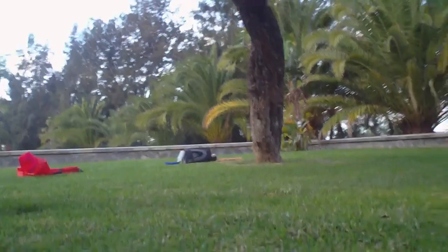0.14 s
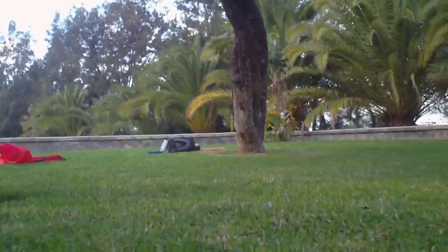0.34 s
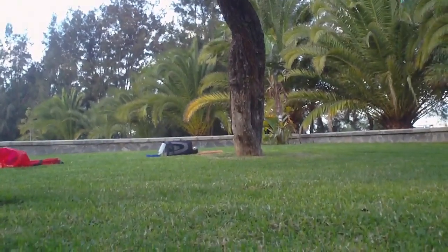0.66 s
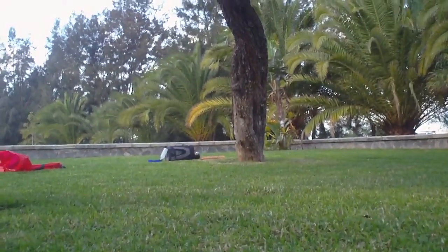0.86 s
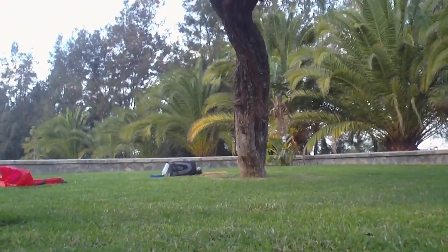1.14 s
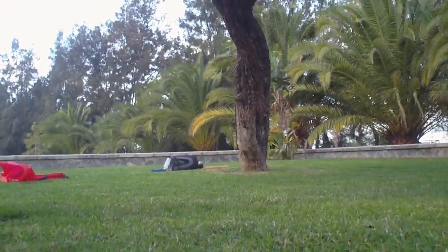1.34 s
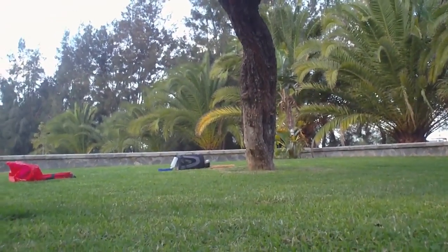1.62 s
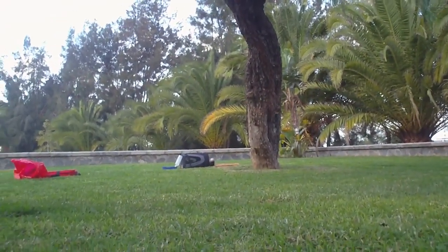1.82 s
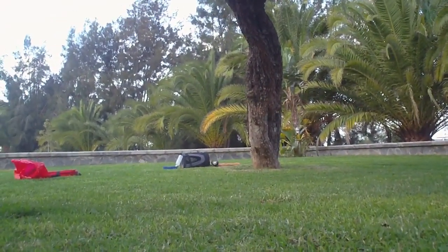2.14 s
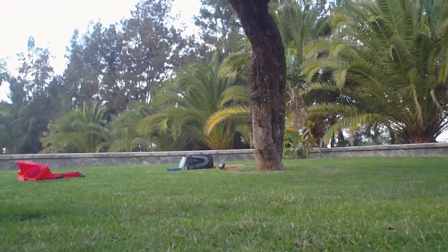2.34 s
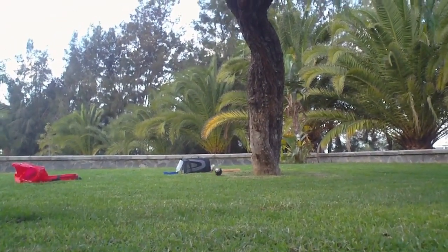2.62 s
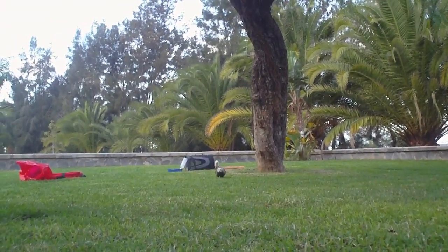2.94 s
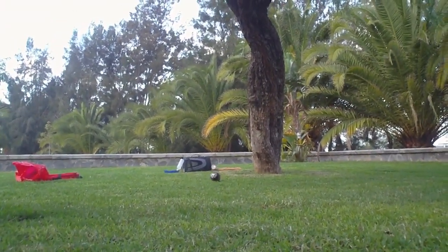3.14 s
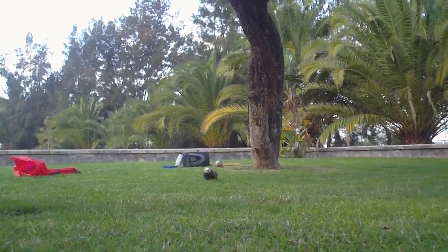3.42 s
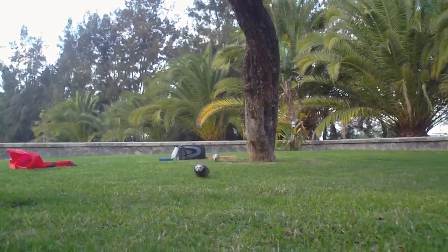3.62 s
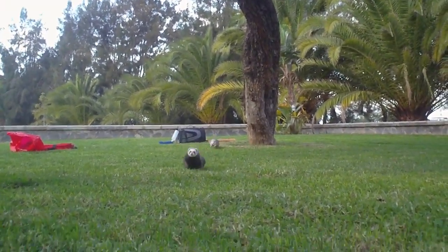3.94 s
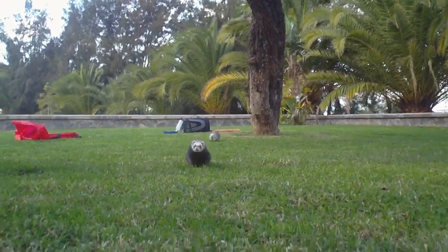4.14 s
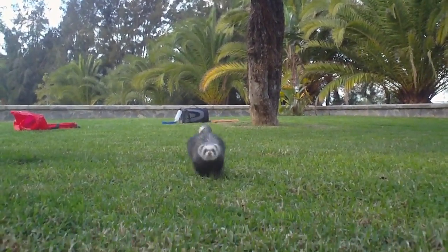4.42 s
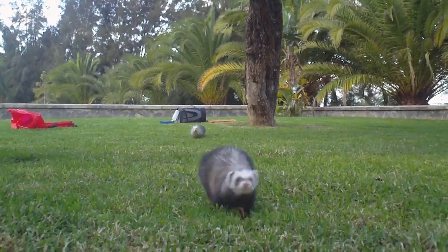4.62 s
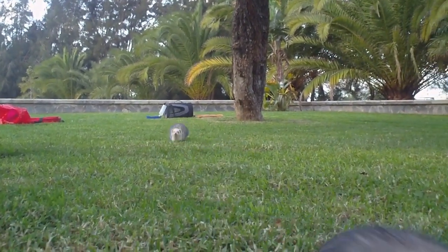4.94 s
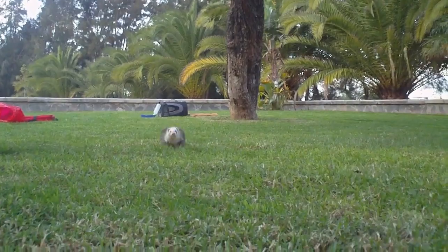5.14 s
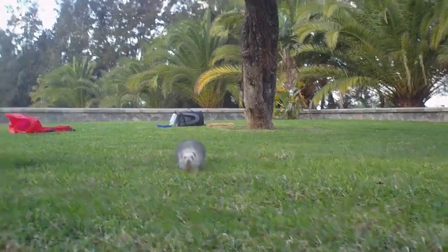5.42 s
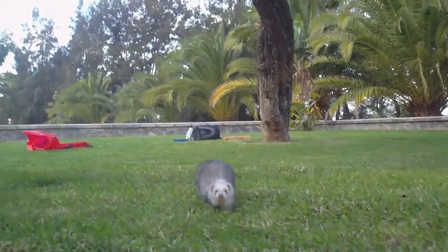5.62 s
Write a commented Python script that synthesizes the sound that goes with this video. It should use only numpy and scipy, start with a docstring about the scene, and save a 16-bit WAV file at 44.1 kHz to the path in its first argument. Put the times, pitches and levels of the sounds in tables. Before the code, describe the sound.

Three sharp clicks, then short rising-and-falling toy squeaks repeated close to the microphone outdoors, with faint bird whistles and a brief grass rustle near the end.

```python
"""Squeaky toy in the park

A rubber toy is squeezed again and again close to the microphone, calling a ferret across a lawn.
Each squeeze blows a small reed that bends up and down in pitch; the toy refills with a soft noise hiss.
Three sharp clicks come first, as resonances rung by a snap; the rubber ticks, and hand and paws bump dully.
A far bird whistles in gliding sines and the town rumbles in filtered noise.
The ferret rustles past in dense random grains, with grass blades snapping under its paws."""
import sys
import numpy as np
from scipy import signal
from scipy.fft import rfft, irfft, next_fast_len
from scipy.io import wavfile

SR = 44100
rng = np.random.default_rng(int(sys.argv[2]) if len(sys.argv) > 2 else 0)


def bounce(signal):
    """Save signal as a 16-bit WAV file at the path given by the first command-line argument."""
    frames = np.transpose(np.atleast_2d(signal))
    limited = np.clip(frames, -1, 1)
    pcm = np.round(limited * 32767).astype(np.int16)
    wavfile.write(sys.argv[1], SR, pcm)


N = 254501
TIME = np.arange(N) / SR

# Colour of the far town. Each row: frequency in Hz, relative level in dB.
TOWN_COLOUR = [(25, -12.5), (108, -2.5), (200, 1.5), (420, -8.5), (900, -14.5), (1500, -18.5),
               (3100, -27.5), (6700, -28.5), (9500, -36), (11300, -51), (13000, -41.5), (15500, -46)]
# Slow drift of the town before its overall trim. Each row: time in seconds, level in dB.
TOWN_DRIFT = [(0, -43.5), (.7, -39), (1.4, -41.5), (2.5, -37), (5.1, -38.5), (5.77, -37.5)]
# Colour of the low buffeting. Each row: frequency in Hz, relative level in dB.
BUFFET_COLOUR = [(25, -9), (45, -2), (80, 2), (140, -1), (250, -10), (600, -43.5)]
# Colour of the steady hiss that differs between the sides. Each row: frequency in Hz, relative level in dB.
SIDE_COLOUR = [(100, -6), (1000, -10.0), (3000, -16.5), (7000, -16), (10000, -16.5), (15000, -21.0)]
# Sharp opening clicks. Each row: start in seconds, peak level in dB.
CLICKS = [(.0385, -8), (.1707, -4), (.3115, -2)]
# Resonances of the clicks. Each row: frequency in Hz, width in Hz, relative level in dB.
CLICK_MODES = [(820, 57, -10), (1770, 400, -9.5), (3130, 400, 0.5), (4710, 370, -1), (7230, 440, -7),
               (13300, 770, -18)]
# Dull bumps of the hand and of paws on the turf. Each row: start in seconds, level in dB, pitch in Hz,
# envelope time in seconds (twice the time to its peak).
BUMPS = [(0.055, -18.5, 89, 0.0058), (0.104, -26.5, 67.6, 0.019), (.23, -27.5, 79, 0.019),
         (0.651, -20, 113, 0.0056), (0.672, -22.5, 144, 0.0087), (0.763, -27.5, 123, 0.015),
         (5.155, -20.5, 277, 0.016), (5.16, -25, 558, 0.0072), (5.4, -20, 274, 0.0061)]
# Colour of the dull puff in each bump. Each row: frequency in Hz, relative level in dB.
PUFF_COLOUR = [(60, -3), (250, -1), (600, -6), (1500, -19.5), (5000, -23), (12000, -44)]
# Whistles of the far bird. Each row: start in seconds, base level in dB.
BIRD_CALLS = [(.11, -48.5), (1.146, -49.5), (2.199, -48), (3.899, -53)]
# Course of one whistle. Each row: time into the call in seconds, pitch in Hz, level against the base in dB.
WHISTLE = [(0, 3530, -20), (.02, 3900, -7), (0.039, 4150, 0.5), (.06, 4300, 6), (.075, 5200, -2),
           (.095, 5700, -1), (.125, 5450, -12)]
# Ticks of the rubber under the fingers. Each row: start in seconds, peak level in dB before softening.
TICKS = [(.504, -26.5), (.877, -22), (1.292, -20.5), (1.645, -19.5), (1.955, -22), (2.477, -20.5),
         (3.133, -19), (3.253, -21), (3.346, -16.5), (3.466, -21), (3.553, -24), (4.672, -21.5)]
# Resonances of the ticks. Each row: frequency in Hz, width in Hz, relative level in dB.
TICK_MODES = [(760, 610, 9.5), (1370, 236, 17.5), (2230, 900, 4.5), (4170, 2500, -0.5), (7350, 1500, 1.5)]
# Colour of the air drawn back into the toy. Each row: frequency in Hz, relative level in dB.
REFILL_COLOUR = [(3000, -9), (5000, -16.5), (6300, -1), (7200, -3.5), (8500, -9), (10500, -23.5),
                 (15000, -38)]
# Squeezes of the toy. Each row: onset in seconds, time to top pitch in seconds, length in seconds,
# top pitch in Hz, end pitch in Hz, base level of the fundamental in dB.
SQUEEZES = [(0.97, 0.023, 0.083, 1111, 879, -9.5), (1.364, .023, 0.088, 1118, 862, -9.5),
            (1.687, 0.035, 0.093, 1119, 910, -9.5), (1.985, 0.044, .11, 1116, 873, -9.5),
            (2.264, .026, .085, 1135, 900, -7.5), (2.512, 0.023, 0.084, 1135, 933, -5.5),
            (2.75, 0.026, .074, 1125, 920, -6), (2.968, 0.022, 0.064, 1136, 974, -4.5),
            (3.173, 0.03, 0.067, 1136, 930, -4), (3.389, 0.014, .059, 1093, 1009, -6),
            (3.587, 0.02, 0.058, 1132, 1040, -4), (3.786, 0.033, 0.065, 1130, 1010, -5.3),
            (3.989, 0.024, 0.064, 1126, 996, -5), (4.187, .021, 0.065, 1124, 984, -5),
            (4.388, 0.023, 0.06, 1126, 1010, -5.5), (4.594, 0.027, 0.059, 1118, 1016, -5.5),
            (4.788, .021, 0.059, 1131, 1009, -4.5), (4.987, 0.028, 0.053, 1133, 1000, -6),
            (5.184, 0.016, 0.099, 1120, 854, -8), (5.747, 0.0115, 0.081, 1102, 900, -12)]
# Colour that the reed's pipe gives the overtones. Each row: frequency in Hz, gain in dB.
PIPE_COLOUR = [(1900, 17), (2300, 3), (2900, 6.5), (3400, 1), (4400, 8.5), (5000, 7), (5500, 2.5),
               (6250, 6), (6900, -6.5), (7300, -5.5), (7800, -0.5), (8700, -2), (9400, -21), (10200, -16.5),
               (11300, -33.5), (13500, -31), (15500, -45)]
# Colour of the air that rushes past the reed. Each row: frequency in Hz, relative level in dB.
RUSH_COLOUR = [(500, -10.5), (1200, -6.5), (2800, -5.5), (6500, -14), (9000, -15.5), (11000, -3),
               (14000, -22)]
# The toy's colour shifts as it turns in the hand. Each row: time in seconds, octave level in dB,
# level of the other overtones in dB, depth of the hollow in dB, tilt in dB per octave.
GRIP = [(.97, -26.5, -24, 4, -1), (1.98, -25, -23.5, 2.5, -1.5), (2.26, -20.5, -20.5, 6, 1),
        (3.17, -18.5, -22, 4, 0.1), (3.601, -27.5, -24.5, 15, 4), (4.0, -26, -23, 16, 2),
        (4.55, -23, -22.5, 18.5, -2.4), (5.18, -20.5, -22.5, 8.5, 4.5), (5.75, -18.5, -27, 4.5, 6.5)]
# Moments when the reed rasps. Each row: middle in seconds, half length in seconds, roughness from 0 to 1.
RASPS = [(3.227, .004, .5), (3.80, .012, .28), (4.032, .015, .5), (5.215, .025, .18)]
# The rubber buckles and kinks the pitch. Each row: middle in seconds, shift in Hz, half length in seconds.
BUCKLES = [(0.993, 13, 0.0036), (1.392, 5, 0.0032), (1.723, 23, 0.0068), (2.029, 22, 0.0055),
           (3.229, -47, 0.0041), (3.415, 36, 0.006), (3.428, -21, 0.0047)]
# Hiss bursts that spread to both sides. Each row: middle in seconds, half length in seconds, level in dB.
WIDE_BURSTS = [(3.395, .012, -49), (3.596, 0.012, -52), (3.801, 0.011, -25), (4.028, 0.012, -23)]
# Colour of those bursts. Each row: frequency in Hz, relative level in dB.
WIDE_COLOUR = [(3800, -47), (5300, 3), (6500, -5), (8300, -3), (9500, -20), (14000, -37)]
# Colour of the grass rustle. Each row: frequency in Hz, relative level in dB.
GRASS_COLOUR = [(400, 3), (1500, -9.5), (3500, -8), (7000, -1.5), (9000, -4.5), (11300, -9), (13500, -5),
                (15500, -10)]
# Blades that snap under a paw. Each row: start in seconds, peak level in dB.
SNAPS = [(4.905, -22), (5.063, -12.5), (5.097, -27), (5.305, -23), (5.393, -20.5)]
# Resonances of the snapping blades. Each row: frequency in Hz, width in Hz, relative level in dB.
SNAP_MODES = [(3200, 2000, 2), (6000, 2200, 6), (8500, 2200, 10), (13900, 2500, -21)]

# A quick squeeze and a slow one; lengths in between blend them. Each row: length in seconds, attack in seconds,
# climb to the top in Hz, exponent of the fall, sag in dB per second, swell at the onset in dB.
QUICK, SLOW = (0.063, 0.00607, 56, 1.66, 56, 0.21), (0.092, 0.0086, 74, 1.86, 16, 3)

# low buffeting on the microphone dies down as it comes to rest
BUFFET_START_DB, BUFFET_REST_DB, BUFFET_SETTLE_S = -37.5, -52.5, 2.8
GUST_DB, GUSTS_PER_S = -2.5, 7.3
PUFF_DB, PUFF_S = -12.5, 0.01   # against its bump; decay time
BIRD_FLUTTER_DB = 3.5
ECHO_T60_S, ECHO_DB = 0.3, -3.5   # the trees scatter the whistle
SOFT_TICK_DB, SOFT_TICK_SPREAD_DB = -26.5, 1.5   # one fainter tick somewhere in each pause
# the hand starts lazily and settles into its rhythm; the toy refills shortly before each squeeze
SETTLE_S, USUAL_PAUSE_S, FIRST_PAUSE_S = 0.4, 0.13, 1
REFILL_LEAD_S, LAZY_LEAD_S = 0.12, 0.22   # the lazy amounts are added at first, then fade
REFILL_HALF_S, LAZY_HALF_S = 0.026, 0.04
REFILL_DB, REFILL_DB_PER_DOUBLED_PAUSE = -40.5, -2.5
REED_REST_HZ, HOLLOW_HZ, HOLLOW_WIDTH_HZ = 809.5, 4450, 550
LEAD_IN_S, SLOW_LEAD_IN_S, RELEASE_S, SWELL_S = 0.0025, 0.018, 0.0066, 0.016
FREE_SWING_S = 0.018   # the reed swings on this long after the squeeze
JUMP = 1.62   # exponent: before the onset the pitch lags behind the pressure, then jumps
WAVER, WAVER_PER_S = 0.0051, 103   # unsteady pitch: share of the pitch, rate
# loss per 100 Hz of slack in pitch, the last one extra per octave of overtone
TONE_LOSS_DB, OVERTONE_LOSS_DB, TREBLE_LOSS_DB = 7.5, 7, 0.1
# a reflection from the hand, a little different on every squeeze, ripples the overtones
HAND_ECHO, HAND_DELAY_MIN_S, HAND_DELAY_MAX_S = 0.33, 0.001188, 0.003
# the ferret runs through the grass past the microphone
PASS_S, PASS_DISTANCE_M, FERRET_M_PER_S = 5.085, 0.75, 1.76
RUSTLE_DB, RUSTLE_DB_PER_DOUBLED_DISTANCE = -38.5, -24.5
PAW_DB, PAW_S = 6, 0.016   # the rustle flares where a paw comes down: gain, half length
MIC_DIP_HZ, MIC_DIP_WIDTH_HZ, CUTOFF_HZ = 11320, 1400, 15700


def from_db(db):
    """Turn decibels into gain."""
    return 10 ** (np.asarray(db) / 20)


def rms_one(x):
    """Scale to unit rms."""
    return x / np.sqrt(np.mean(x ** 2) + 1e-20)


def in_time(rows):
    """Draw a curve through (seconds, value) points at every sample."""
    return np.interp(TIME, *np.transpose(rows))


def at_hz(points, hz):
    """Read a spectrum in dB on a log-frequency axis."""
    freqs, db = np.transpose(points)
    return np.interp(np.log(hz + 1e-6), np.log(freqs), db)


def coloured(x, spectrum):
    """Filter a signal with a smooth spectrum and bring it to unit rms."""
    size = next_fast_len(N)
    hz = np.arange(size // 2 + 1) * SR / size
    filtered = irfft(rfft(x, size) * from_db(at_hz(spectrum, hz)), size)
    return rms_one(filtered[:N])


def noise(spectrum):
    """Coloured noise over the whole scene."""
    return coloured(rng.standard_normal(N), spectrum)


def wander(t, rate):
    """Random values, rate per second, joined by lines."""
    steps = (t - t[0]) * rate
    return np.interp(steps, np.arange(2048), rng.standard_normal(2048))


def swell(s, half):
    """A smooth rise and fall around one moment; height 1."""
    return np.exp(-((TIME - s) / half) ** 2)


def strike(events, modes, rebound_s, rebound):
    """A snap and its quick rebound ring a few resonances."""
    snap = np.zeros(1024)
    snap[0] = 1
    snap[int(np.clip(rebound_s * SR, 1, 500))] = rebound
    ring = np.zeros(len(snap))
    for k, (hz, width, db) in enumerate(modes):
        radius = np.exp(-np.pi * width / SR)
        poles = [1, -2 * radius * np.cos(2 * np.pi * hz / SR), radius ** 2]
        sign = (-1) ** k
        ring += sign * from_db(db) * (1 - radius ** 2) * signal.lfilter([1, 0, -1], poles, snap)
    ring /= np.abs(ring).max()
    out = np.zeros(N)
    for s, db in events:
        at = int(s * SR)
        out[at:at + len(ring)] += (from_db(db) * ring)[:N - at]
    return out


def park(town_db=1.5):
    """Far town rumble as drifting noise, and low gusty buffeting close by."""
    town = from_db(in_time(TOWN_DRIFT) + town_db) * noise(TOWN_COLOUR)
    settling = np.exp(-(TIME / BUFFET_SETTLE_S) ** 2)
    buffet_db = BUFFET_REST_DB + (BUFFET_START_DB - BUFFET_REST_DB) * settling
    buffet_db = buffet_db + GUST_DB * wander(TIME, GUSTS_PER_S)
    return town + from_db(buffet_db) * noise(BUFFET_COLOUR)


def side_hiss():
    """A very faint steady noise for the difference between the sides."""
    return from_db(-74) * noise(SIDE_COLOUR)


def clicks():
    """Sharp snaps ring bright resonances, with a weak rebound."""
    return strike(CLICKS, CLICK_MODES, rebound_s=0.0007, rebound=0.11)


def bumps():
    """Each bump is a low tone that swells fast and dies away, with a puff of dull noise."""
    out, puff = np.zeros(N), np.zeros(N)
    for s, db, hz, envelope_s in BUMPS:
        t = np.maximum(TIME - s, 0)
        envelope = (2 * t / envelope_s) * np.exp(1 - 2 * t / envelope_s)
        out += from_db(db) * envelope * np.sin(2 * np.pi * hz * t)
        puff += from_db(db + PUFF_DB) * (t > 0) * np.exp(-t / PUFF_S)
    return out + puff * noise(PUFF_COLOUR)


def bird():
    """A thin whistle, a sine gliding upward with random waver and flutter in each call."""
    out = np.zeros(N)
    times, pitches, levels = np.transpose(WHISTLE)
    t = np.arange(int(times[-1] * SR)) / SR
    for s, db in BIRD_CALLS:
        hz = np.interp(t, times, pitches) * (1 + 0.013 * wander(t, 660))
        level_db = db + np.interp(t, times, levels) + BIRD_FLUTTER_DB * wander(t, 153)
        gain = from_db(level_db) * signal.windows.tukey(len(t), 0.2)
        at = int(s * SR)
        out[at:at + len(t)] += gain * np.sin(2 * np.pi * np.cumsum(hz) / SR)
    return out


def among_trees(x):
    """Leaves and trunks blur a far sound with a short diffuse echo of decaying noise."""
    t = TIME[:SR // 2]
    echo = rng.standard_normal(len(t)) * from_db(-60 * t / ECHO_T60_S)
    echo /= np.linalg.norm(echo)
    return x + from_db(ECHO_DB) * signal.fftconvolve(x, echo)[:N]


def pauses():
    """Onset of each squeeze and the length of the rest before it."""
    onsets, _, lengths = np.transpose(SQUEEZES)[:3]
    return onsets, np.append(FIRST_PAUSE_S, np.diff(onsets) - lengths[:-1])


def ticks(edge_hz=6500):
    """The rubber ticks as the fingers shift between squeezes; being soft, it gives no bright edge."""
    onsets, rests = pauses()
    soft_times = np.maximum(onsets - rests * rng.random(len(rests)), 0)
    soft_db = SOFT_TICK_DB + SOFT_TICK_SPREAD_DB * rng.standard_normal(len(rests))
    knocks = strike([*TICKS, *zip(soft_times, soft_db)], TICK_MODES, rebound_s=0.0011, rebound=0.44)
    return signal.sosfilt(signal.butter(2, edge_hz, fs=SR, output="sos"), knocks)


def refills():
    """Air hisses back into the toy before each squeeze, more gently after a long rest."""
    onsets, rests = pauses()
    lazy = np.exp(-(onsets - onsets[0]) / SETTLE_S)
    middles = onsets - REFILL_LEAD_S - LAZY_LEAD_S * lazy
    halves = REFILL_HALF_S + LAZY_HALF_S * lazy
    levels = REFILL_DB + REFILL_DB_PER_DOUBLED_PAUSE * np.log2(rests / USUAL_PAUSE_S)
    suction = sum(from_db(db) * swell(s, half) for s, half, db in zip(middles, halves, levels))
    return suction * noise(REFILL_COLOUR)


def squeak(t, rasp, kink_hz, to_top, length, top_hz, end_hz, db, octave_db, overtones_db, hollow_db, tilt_db):
    """One squeeze: air pressure bends the reed's pitch up and back, and drives its level with it."""
    slow = np.clip((length - QUICK[0]) / (SLOW[0] - QUICK[0]), 0, 1)
    blend = (1 - slow) * np.array(QUICK[1:]) + slow * np.array(SLOW[1:])
    attack, climb_hz, arch, sag_db, swell_db = blend

    # pitch, and how far it hangs below the top
    rise = climb_hz * np.clip(1 - t / to_top, 0, 1) ** 1.28
    fall = (top_hz - end_hz) * np.clip((t - to_top) / (length - to_top), 0, 1) ** arch
    blown = np.interp(t, [-attack, 0, length, length + RELEASE_S], [0, 1, 1, 0])
    bend_hz = top_hz - rise - fall - REED_REST_HZ
    hz = REED_REST_HZ + bend_hz * blown ** np.where(t < 0, JUMP, 1)
    slack = np.abs(top_hz - hz) / 100
    pressure_slack = np.abs(top_hz - REED_REST_HZ - bend_hz * blown) / 100
    hz = hz + kink_hz
    unsteady = 1 + 0.0018 * wander(t, 500) + WAVER * wander(t, WAVER_PER_S)
    phase = 2 * np.pi * np.cumsum(hz * unsteady) / SR

    # the reed swings freely before and after it is blown; a slow squeeze has a longer lead-in
    swing_start = -attack - LEAD_IN_S - SLOW_LEAD_IN_S * slow
    swing_end = length + FREE_SWING_S
    swing = np.interp(t, [swing_start, -attack, swing_end, swing_end], [0, 1, 1, 0])
    tone_db = db + swell_db * np.exp(-(np.maximum(t, 0) / SWELL_S) ** 2)
    tone_db = tone_db - TONE_LOSS_DB * pressure_slack - sag_db * (t - to_top) + 0.6 * wander(t, 120)
    out = swing * from_db(tone_db) * np.sin(phase)

    # overtones come from the reed slapping shut, and drop away once the pressure is too slack
    slapping = np.clip(15 * blown, 0, 1)
    missing = 1 / (1 + np.exp(-4.5 * (slack - 1.7)))
    hand_s = rng.uniform(HAND_DELAY_MIN_S, HAND_DELAY_MAX_S)
    for k in range(2, 15):
        partial_hz = k * hz
        octaves = np.log2(partial_hz / 5500)
        level_db = octave_db if k == 2 else overtones_db + tilt_db * octaves
        level_db = level_db + at_hz(PIPE_COLOUR, partial_hz)
        level_db = level_db - (OVERTONE_LOSS_DB + TREBLE_LOSS_DB * octaves) * slack
        level_db = level_db - 3.9 * np.log2(k) * missing
        level_db = level_db - hollow_db * np.exp(-((partial_hz - HOLLOW_HZ) / HOLLOW_WIDTH_HZ) ** 2)
        level_db = level_db + min(0.3 * k, 2.5) * wander(t, 50)
        ripple = 1 + HAND_ECHO * np.cos(2 * np.pi * partial_hz * hand_s)
        # uneven slaps fray the upper partials, the more as the pressure fails
        uneven = (0.02 + rasp + 0.2 * missing) * min(k / 5, 1) ** 3
        slip = uneven * wander(t, 1100)
        gain = slapping * ripple * from_db(level_db) * (1 + uneven * wander(t, 910))
        out += gain * np.sin(k * phase + slip)

    # at the end of a slow squeeze the reed's tip gives a last thin buzz
    buzz = slow * from_db(-33) * np.exp(-((t - length - 0.005) / 0.0066) ** 2)
    out += buzz * (wander(t, 400) * np.sin(7 * phase) + wander(t, 400) * np.sin(8 * phase))
    air_flow = slapping * from_db(overtones_db - 3.2 * slack)
    return out, air_flow


def toy(rush_db=-20):
    """All squeezes of the reed, and the noise of air that rushes past it."""
    reed, flow = np.zeros(N), np.zeros(N)
    rasp = sum(rough * swell(s, half) for s, half, rough in RASPS)
    kinks = sum(hz * swell(s, half) for s, hz, half in BUCKLES)
    grip_s, *grip = np.transpose(GRIP)
    for onset, *squeeze in SQUEEZES:
        span = slice(int((onset - 0.04) * SR), int((onset + 0.15) * SR))
        colour = [np.interp(onset, grip_s, column) for column in grip]
        reed[span], flow[span] = squeak(TIME[span] - onset, rasp[span], kinks[span], *squeeze, *colour)
    return reed + flow * from_db(rush_db) * noise(RUSH_COLOUR)


def wide_bursts():
    """Brief swells of treble noise for the difference between the sides."""
    level = sum(from_db(db) * swell(s, half) for s, half, db in WIDE_BURSTS)
    return level * noise(WIDE_COLOUR)


def grass(grains_per_s=6000, spread_db=2.5, clump_db=4.5):
    """Blades flick against fur and paws in dense, clumped grains, loudest as the ferret passes."""
    sizes = from_db(spread_db * np.minimum(rng.exponential(1, N), 5)) * rng.choice([-1, 1], N)
    grains = sizes * (rng.random(N) < grains_per_s / SR)
    distance = np.hypot(PASS_DISTANCE_M, FERRET_M_PER_S * (TIME - PASS_S))
    level_db = RUSTLE_DB + RUSTLE_DB_PER_DOUBLED_DISTANCE * np.log2(distance / PASS_DISTANCE_M)
    level_db = level_db + PAW_DB * sum(swell(s, PAW_S) for s, _ in SNAPS)
    level_db = level_db + clump_db * wander(TIME, 74)
    rustle = from_db(level_db) * coloured(grains, GRASS_COLOUR)
    return rustle + strike(SNAPS, SNAP_MODES, rebound_s=0.0017, rebound=0.87)


def scene():
    """Everything sits in the middle; only hiss differs between the sides."""
    mid = park() + clicks() + bumps() + among_trees(bird()) + ticks() + refills() + toy() + grass()
    side = side_hiss() + wide_bursts()
    return np.array([mid + side, mid - side])


def record(dry):
    """The microphone has a narrow dip in the treble; the top is cut steeply."""
    dip = signal.iirnotch(MIC_DIP_HZ, MIC_DIP_HZ / MIC_DIP_WIDTH_HZ, fs=SR)
    heard = signal.lfilter(*dip, dry)
    return signal.sosfilt(signal.ellip(10, 0.1, 90, CUTOFF_HZ, fs=SR, output="sos"), heard)


dry = scene()
out = record(dry)
bounce(out)
```